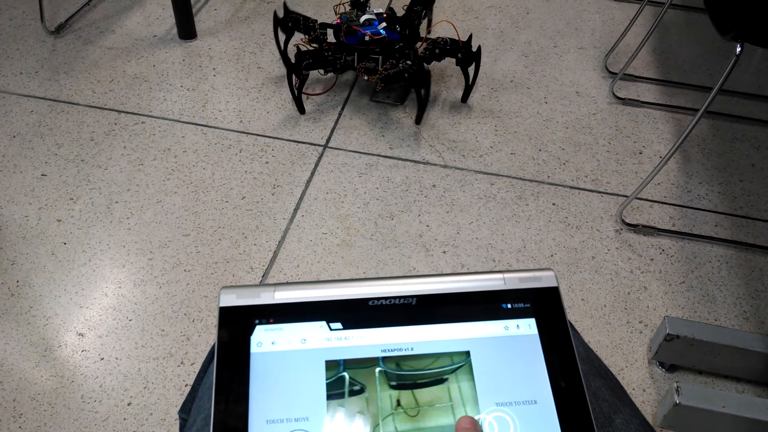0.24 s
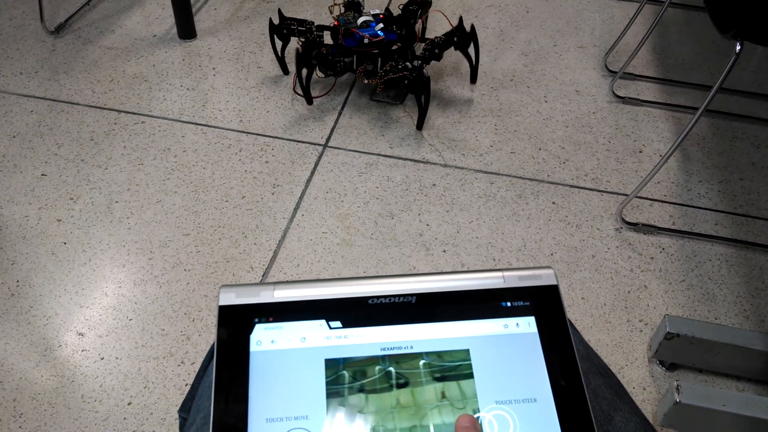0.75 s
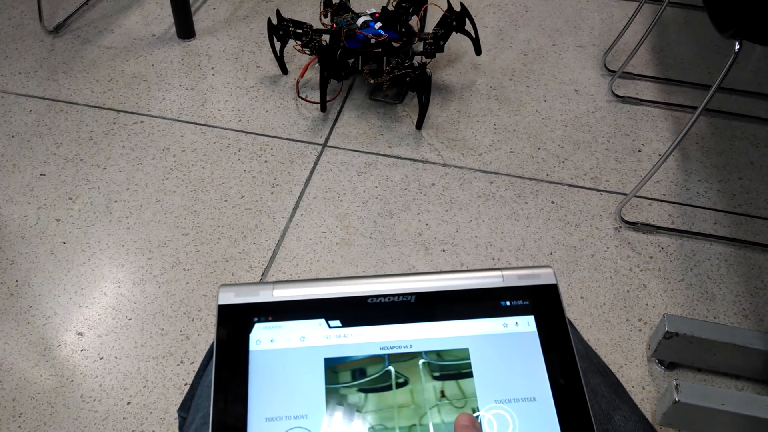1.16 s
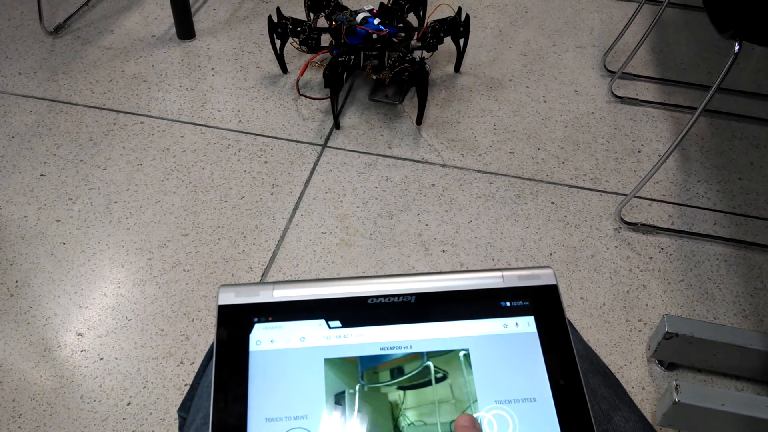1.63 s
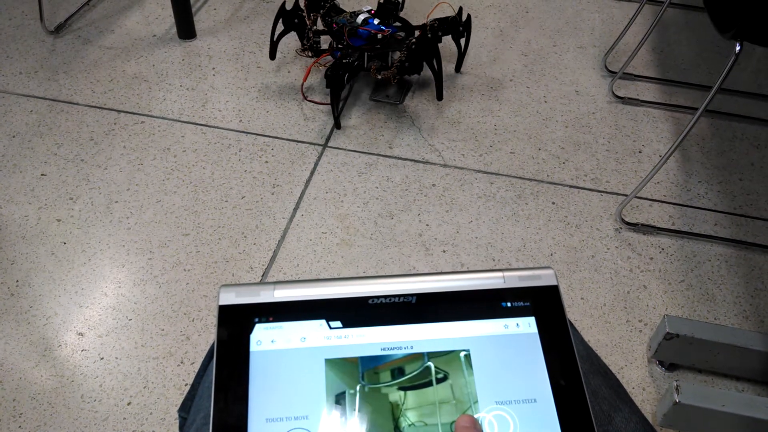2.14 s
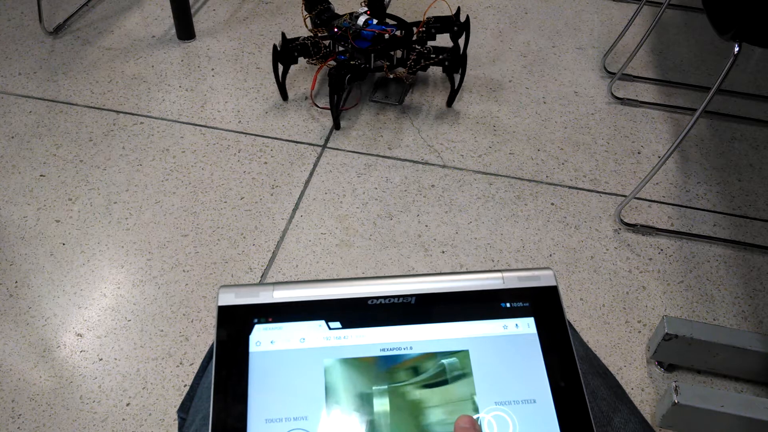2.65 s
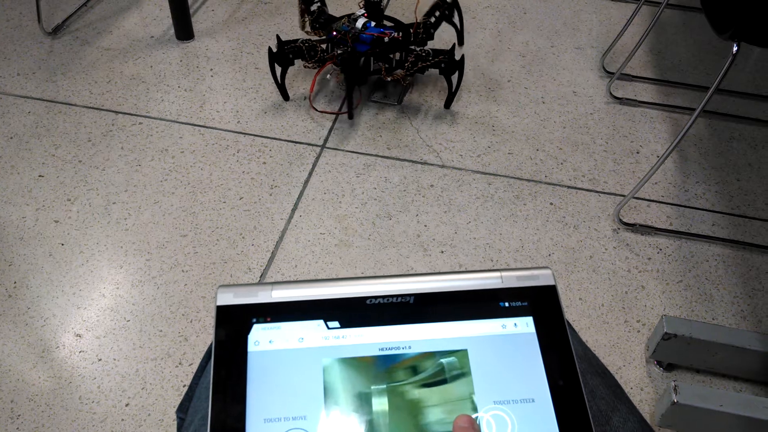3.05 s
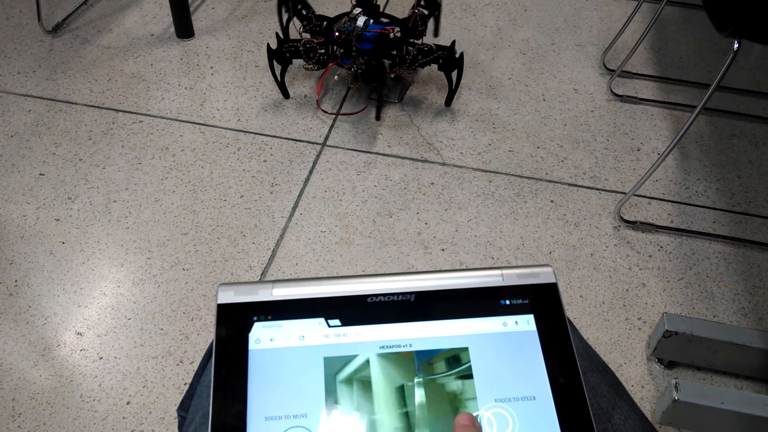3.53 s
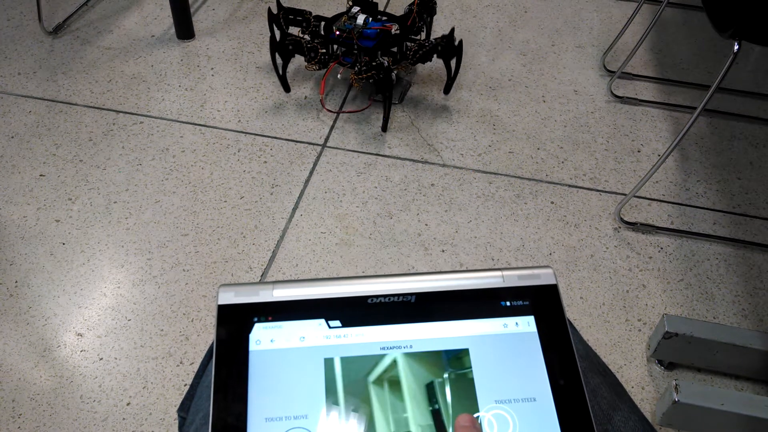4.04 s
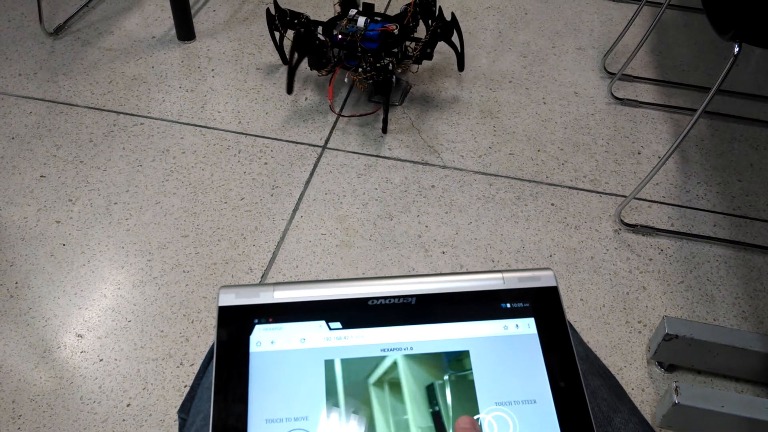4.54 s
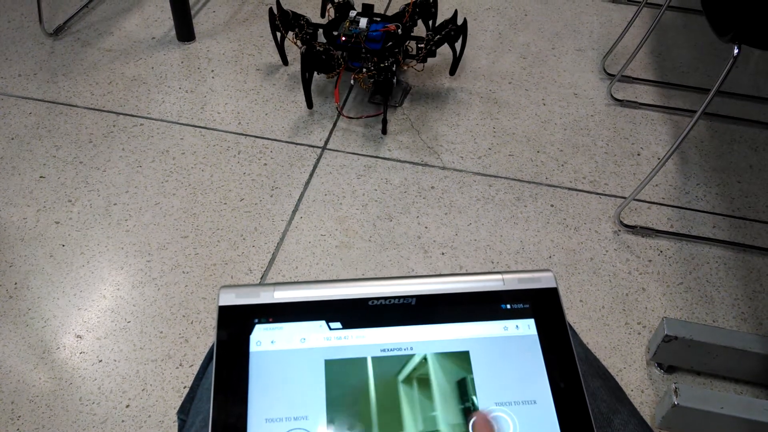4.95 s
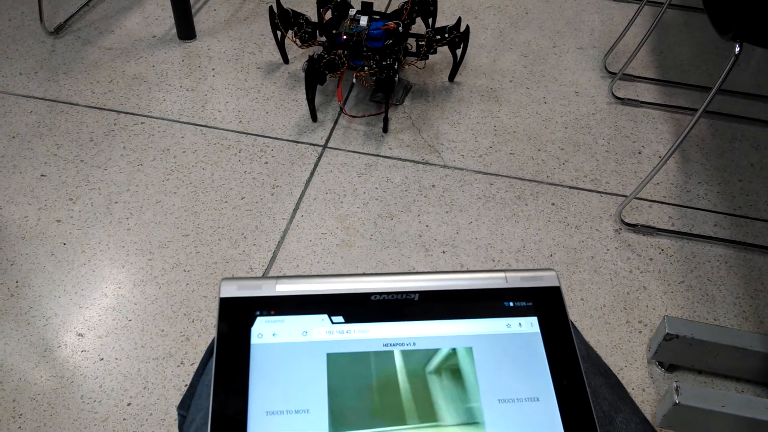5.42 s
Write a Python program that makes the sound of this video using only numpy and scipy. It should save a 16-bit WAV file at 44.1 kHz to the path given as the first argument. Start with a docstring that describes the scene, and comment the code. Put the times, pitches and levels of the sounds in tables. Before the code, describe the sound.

A small six-legged robot walks across a hard indoor floor. Its servo motors whir in short pulses, about four a second, with a high, raspy rattle of plastic gears. Feet tick and joints scrape briefly, and now and then the body drops onto a leg with a soft double knock, twice with a sharp click. A dull bump comes near the end. The room echoes lightly, and ventilation hums behind.

```python
"""A ventilated room with a hard floor; a small six-legged robot walks across it.
Gait: a cycle of nine moves, about four a second. Servos run up and stop, gear teeth rattling
and whining in plastic cases. Feet tick, joints scrape, and now and then the frame drops onto
a leg with a soft double knock. A dull bump as it comes to rest. Behind it: air, fan tones, a drone."""
import sys
import numpy as np
from scipy import signal
from scipy.fft import rfft, irfft, next_fast_len
from scipy.io import wavfile

SR = 44100
rng = np.random.default_rng(int(sys.argv[2]) if len(sys.argv) > 2 else 0)


def store_wav(level_fs):
    """Save 16-bit WAV to argv[1]."""
    pcm = np.round(np.clip(np.atleast_2d(level_fs), -1, 1) * 32767)
    wavfile.write(sys.argv[1], SR, pcm.T.astype(np.int16))


N = 250481
TIME = np.arange(N) / SR
FFT_SIZE = next_fast_len(N + SR)
HZ = np.maximum(np.arange(FFT_SIZE // 2 + 1) * SR / FFT_SIZE, 1)
CUTOFF_HZ = 15550

# Frame drops onto a leg. Each row: start in seconds, first and second blow in dB, gap in seconds.
DROPS = [(.406, -35.5, -37, 0.047), (1.6096, -25.5, -22, 0.038), (2.75, -37, -38.5, 0.04),
         (3.452, -41.5, -48, 0.054), (3.8715, -29, -27, .033), (5.181, -31, -41, 0.039)]


def from_db(db):
    """Decibels to gain."""
    return 10 ** (np.asarray(db) / 20)


def unit_rms(x):
    """Scale to rms 1."""
    return x / np.sqrt(np.mean(x ** 2) + 1e-20)


def over_time(rows):
    """Interpolate each column after the time column at every sample."""
    times_s, *columns = np.transpose(rows)
    return [np.interp(TIME, times_s, column) for column in columns]


def over_hz(points):
    """Interpolate a table on a log-frequency axis."""
    hz, value = np.transpose(points)
    return np.interp(np.log(HZ), np.log(hz), value)


def filtered(x, gain):
    """Apply a gain per frequency."""
    return irfft(rfft(x, FFT_SIZE) * gain, FFT_SIZE)[..., :N]


def colour(spectrum):
    """Gain per frequency that keeps the power of white noise."""
    return unit_rms(from_db(over_hz(spectrum)) * (HZ < CUTOFF_HZ + 500))


def drift(rate_hz):
    """Slow random signal, rms 1."""
    return unit_rms(filtered(rng.standard_normal(FFT_SIZE), 1 / (1 + (HZ / rate_hz) ** 2)))


def rough_tone(hz, width_hz):
    """Two independent narrow noise bands around a pitch given per sample."""
    phase = 2 * np.pi * np.cumsum(hz) / SR
    return np.array([drift(width_hz) * np.sin(phase) + drift(width_hz) * np.cos(phase)
                     for _ in range(2)])


def swell(peak_s, db, half_s):
    """Bell-shaped envelope."""
    return from_db(db) * np.exp(-((TIME - peak_s) / half_s) ** 2)


def reflections(x, t60_s):
    """Two independent sprays of dying echoes, each of unit energy."""
    t = TIME[:SR]
    spray = rng.standard_normal((2, SR)) * from_db(-60 * t / t60_s) * (1 - np.exp(-t / 0.00036))
    spray /= np.sqrt(np.sum(spray ** 2, axis=1, keepdims=True))
    return filtered(x, rfft(spray, FFT_SIZE))


def moving_reflections(x, t60_s, pose_rad):
    """A change of pose shifts the sound between two sets of echo paths."""
    return reflections(x * np.cos(pose_rad), t60_s) + reflections(x * np.sin(pose_rad), t60_s)


def room(x):
    """Wall echoes, one tail per band; weakest and shortest at the top."""
    # Each row: upper edge in Hz, gain in dB, T60 in seconds.
    bands = [(3150, 1.5, 0.83), (6660, -6, 0.97), (20000, -8.5, 0.5)]
    pose_rad = 2.75 * drift(2.3)
    echoes, below = 0, 0
    for edge_hz, db, t60_s in bands:
        up_to_edge = 1 / (1 + (HZ / edge_hz) ** 8)
        band = filtered(x, np.sqrt(np.abs(up_to_edge - below)))
        echoes = echoes + from_db(db) * moving_reflections(band, t60_s, pose_rad)
        below = up_to_edge
    return echoes


def ventilation(rumble_db=-40.5, rumble_top_hz=750, fan_hz=528.5, waver_db=2, waver_rad=1.08):
    """Rumble and rush of moving air, a faint whistle, wavering fan and mains tones."""
    # Air spectra. Each row: frequency in Hz, relative density in dB.
    rumble_spectrum = [(12, -44), (22, -5), (50, 1), (76, -9.5), (110, -6), (146, 2.5), (175, -7),
                       (233, 2.5), (340, -1), (424, -6.5), (560, -3.5), (850, -11.5)]
    rush_spectrum = [(500, -5), (800, 3), (1100, 2), (1450, -2), (2000, -3.5), (2500, -6.5), (3000, -9),
                     (4200, -18), (6000, -20), (9000, -19.5), (15500, -21.5)]
    # Level curves. Each row: time in seconds, relative level in dB.
    rush_curve = [(0.0, -48.5), (1.06, -47.5), (2.34, -51.5), (2.7, -50), (3.94, -52), (5.68, -49)]
    fan_curve = [(0.0, -52), (0.19, -54), (1.15, -54), (1.6, -55), (2.35, -53.5), (2.9, -58), (4.7, -72),
                 (5.68, -55.5)]
    # Each row: time in seconds, pitch in Hz, rms level in dB.
    whistle_curve = [(0, 843, -59), (1.0, 855, -57), (1.28, 871, -49), (1.5, 863, -53), (1.75, 878, -89)]
    # Fan and mains hum. Each row: frequency in Hz, level in dB.
    hum_tones = [(59.2, -58.5), (100.2, -59), (197, -57), (646, -67)]
    rumble_gain = colour(rumble_spectrum) / np.sqrt(1 + (HZ / rumble_top_hz) ** 10)
    rumble = filtered(rng.standard_normal((2, N)), rumble_gain)
    rush = filtered(rng.standard_normal((2, N)), colour(rush_spectrum))
    air = from_db(rumble_db) * rumble + from_db(over_time(rush_curve)[0] + 4) * rush
    whistle_hz, whistle_db = over_time(whistle_curve)
    air += from_db(whistle_db) * rough_tone(whistle_hz, width_hz=21)
    fan_whine = (fan_hz, over_time(fan_curve)[0] + 1.9)
    for hz, db in hum_tones + [fan_whine]:
        phase = 2 * np.pi * hz * TIME + waver_rad * drift(6.1)
        tone = np.sqrt(2) * np.array([np.sin(phase), np.cos(phase)])
        air += from_db(db + waver_db * drift(2.5)) * tone
    return air


def drone(hz=141):
    """A low, rough drone in the room swells twice."""
    envelope = swell(peak_s=1.38, db=-47.5, half_s=.15) + swell(peak_s=5.5, db=-52, half_s=.44)
    return envelope * rough_tone(np.full(N, hz), width_hz=3.4)


def bump(start_s=5.245, db=-36, hz=87.9, rise_s=0.012, t60_s=0.34):
    """One deep mode swells and dies as the robot comes to rest."""
    t = np.maximum(TIME - start_s, 0)
    envelope = (1 - np.exp(-t / rise_s)) * from_db(db - 60 * t / t60_s)
    return np.array([envelope * np.sin(2 * np.pi * hz * t), np.zeros(N)])


def drop_blows(start_s, first_db, second_db, gap_s, bounce_loss_db=3.5):
    """Impulses of one drop: two blows, then three uneven, dying bounces."""
    blows = np.zeros(N)
    blows[int(start_s * SR)] = from_db(first_db)
    blows[int((start_s + gap_s) * SR)] = from_db(second_db)
    for k in range(2, 5):
        bounce_s = start_s + gap_s * (k + rng.uniform(-.125, .125))
        blows[int(bounce_s * SR)] = from_db(first_db - bounce_loss_db * k)
    return blows


def frame_knocks(band_hz=(140, 650), pose_detune=0.017, room_db=-3, room_t60_s=1.23):
    """Soft blows ring the frame, slightly detuned in each pose; the room booms after them."""
    # Frame and legs. Each row: frequency in Hz, level in dB, T60 in seconds.
    frame_modes = [(147, -11.5, 0.36), (199.5, -8.5, 0.5), (236, -7, 0.16), (288, -1.5, 0.1),
                   (336, -10.5, 0.17), (392, -8.5, 0.1), (482, -19, 0.07)]
    t, thud = TIME[:SR], 0
    for drop in DROPS:
        ring = 0
        for hz, db, t60_s in frame_modes:
            detuned_hz = hz * (1 + pose_detune * rng.standard_normal())
            ring += np.sin(2 * np.pi * detuned_hz * t) * from_db(db - 60 * t / t60_s)
        thud += filtered(drop_blows(*drop), rfft(ring, FFT_SIZE))
    # The small frame radiates no deep bass, the soft contact no treble.
    thud = signal.sosfilt(signal.butter(3, band_hz, "band", fs=SR, output="sos"), thud)
    return np.array([thud, np.zeros(N)]) + from_db(room_db) * reflections(thud, room_t60_s)


def joint_scrapes(width_hz=280):
    """Joint friction swells and fades in a narrow resonance."""
    # Each row: peak time in seconds, level in dB, half length in seconds, resonance in Hz.
    scrapes = [(0.565, -34, 0.016, 4980), (0.85, -41.5, 0.04, 4693), (2.83, -36.5, .023, 4976),
               (2.882, -33, .012, 6980), (3.116, -41, 0.015, 4730), (4.106, -37, .012, 6485)]
    return sum(swell(peak_s, db, half_s) * rough_tone(np.full(N, hz), width_hz)
               for peak_s, db, half_s, hz in scrapes)


def contact_ticks(hold_s=0.0006, t60_s=0.012):
    """Hard contacts of feet and joints: cracks that die within milliseconds."""
    # Each row: start in seconds, level in dB, thinness from 0 to 1.
    contacts = [(0.548, -26.5, .5), (1.197, -35.5, 0.9), (1.451, -30, 0.99), (1.6137, -14.5, 0.14),
                (1.616, -18, 0.1), (1.626, -27, 0), (1.653, -29, 0), (1.6873, -27.5, 0), (2.716, -21, 0.99),
                (3.4491, -34.5, 0.95), (3.7112, -32, 0.95), (3.8756, -11.5, 0.18), (3.8889, -37, 0),
                (3.909, -39, .7)]
    # Colour of the bright, broadband ticks. Each row: frequency in Hz, relative density in dB.
    tick_spectrum = [(800, -9), (1700, 0), (2900, 5), (3700, 7.5), (4800, 3), (5600, 5.5), (6600, 12.5),
                     (8200, 3), (9700, 6.5), (11000, 5.5), (13000, -1), (14300, 1), (15500, -5)]
    t, cracks = TIME[:SR // 10], np.zeros((2, N))
    for start_s, db, thinness in contacts:
        at = int(start_s * SR)
        envelope = from_db(db - 60 * np.maximum(t - hold_s, 0) / t60_s)
        crack = rng.choice([-1, 1], (2, len(t))) * envelope
        cracks[:, at:at + len(t)] += signal.lfilter([1, -thinness], [1], crack)
    return filtered(cracks, colour(tick_spectrum))


def gear_whine(effort, whine_hz, power, width_hz=80, sag=.05, wobble=0.0087):
    """The gears of the strongest move sing roughly; pitch wavers, and sags as effort falls."""
    # Gear stages. Each row: ratio to the whine pitch, level in dB.
    stages = [(.5, -10.5), (.66, -11), (.83, -7), (1, 0.5), (1.32, -10)]
    move_power = power * effort ** 4
    strongest = move_power.argmax(0)
    slack = 1 - effort[strongest, np.arange(N)]
    pitch_hz = whine_hz[strongest, 0] * (1 - sag * slack + wobble * drift(24.7))
    tones = sum(from_db(db) * rough_tone(pitch_hz * ratio, width_hz * ratio) for ratio, db in stages)
    return np.sqrt(move_power.max(0)) * tones


def rotor_buzz(speed, rotor_hz, wander=0.0525, depth_db=2.1):
    """Tooth load peaks once per motor turn; a gain of rms 1."""
    turns = np.cumsum(rotor_hz * speed * (1 + wander * drift(14.5))) / SR
    return unit_rms(from_db(depth_db * np.cos(2 * np.pi * turns)))


def gear_train(speed, mesh_hz, backlash_teeth=.14, uneven_db=2.5):
    """One click per meshing tooth; backlash shifts each by part of a tooth."""
    teeth_passed = np.cumsum(mesh_hz * speed) / SR
    tooth = np.arange(20000)
    lateness, strength = np.clip(rng.standard_normal((2, len(tooth))), -2, 2)
    at = np.searchsorted(teeth_passed, tooth + backlash_teeth * lateness)
    clicks = np.bincount(at, from_db(uneven_db * strength), N + 1)[:N]
    return unit_rms(clicks - clicks.mean())


def gear_rattle(speed, friction_db=-5.5, early_db=-3.5):
    """Tooth clicks and sliding friction of four gear trains, scattered by floor and frame."""
    mesh_hz = np.geomspace(800, 1600, 4) * rng.uniform(.9, 1.1, 4)
    trains = np.array([gear_train(speed, hz) for hz in mesh_hz])
    clicks = unit_rms(np.array([trains[::2].sum(0), trains[1::2].sum(0)]))
    direct = unit_rms(clicks + from_db(friction_db) * rng.standard_normal((2, N)))
    early = moving_reflections(direct, t60_s=0.0065, pose_rad=2.43 * drift(5.24))
    return unit_rms(direct + from_db(early_db) * early)


def gear_moves(run_up_s=.066, run_down_s=.047):
    """All that works the gears: gait steps, strains under extra load, jolts from the drops."""
    # Each row: peak time in seconds, relative length, gear noise in dB, shrill share from 0 to 1,
    # whine in Hz, whine in dB relative to the noise.
    gait = [(.101, 0.96, -33.5, 0.68, 9210, -10.5), (.355, 1.04, -32, 0.82, 9320, -10.5),
            (.606, 1.2, -33.5, 0.45, 7960, -8), (.877, 0.99, -36, 0.24, 6830, -7.5),
            (1.124, 1.05, -44, 0, 6160, -11.5), (1.382, 1.11, -36.5, 0.5, 7220, -9.5),
            (1.595, 0.94, -34.5, 0.6, 6500, -12), (1.881, 1.01, -31, 0.38, 7590, -9),
            (2.141, 0.93, -34, 0.28, 5970, -13), (2.368, 0.97, -43, 0.01, 5315, -12),
            (2.625, 1.02, -32.5, 0.63, 9420, -9), (2.884, 0.98, -32, 0.3, 7875, -7.5),
            (3.137, 1, -35, 0.2, 6934, -8), (3.387, 1.1, -43.5, 0.1, 6150, -12.5),
            (3.64, 1.05, -35.5, 0.55, 7286, -11), (3.866, 1, -35, 0.32, 6560, -12),
            (4.145, 1.06, -33, .32, 7630, -5), (4.381, 1.05, -34.5, .26, 5934, -15),
            (4.626, 1.04, -43.5, 0.05, 5356, -10.5), (4.882, 1.14, -35.8, 0.61, 9360, -5.5),
            (5.149, 1.17, -32, 0.73, 9240, -8)]
    # Each row: peak time in seconds, gear noise in dB.
    extra_loads = [(.388, -34), (2.712, -28.5)]

    def move(peak_s, rise_s, fall_s, db, shrill_share, whine_hz=0, whine_db=-np.inf):
        power = from_db(db) ** 2
        shrill, raspy = shrill_share * power, (1 - shrill_share) * power
        return peak_s, rise_s, fall_s, shrill, raspy, whine_hz, from_db(db + whine_db) ** 2

    steps = [move(peak_s, run_up_s * length, run_down_s * length, *sound)
             for peak_s, length, *sound in gait]
    strains = [move(peak_s, rise_s=.055, fall_s=.03, db=db, shrill_share=.77,
                    whine_hz=9500, whine_db=-9.5) for peak_s, db in extra_loads]
    jolts = [move(start_s + .015, rise_s=.006, fall_s=.045, db=second_db - 5, shrill_share=.017)
             for start_s, _, second_db, _ in DROPS]
    return steps + strains + jolts


def servos(shrill_rotor_hz=148, raspy_rotor_hz=278.2, pace_spread=.07, flutter_db=1.36, gain_db=0.2):
    """Each move runs up, holds briefly and stops at its own pace; shrill and raspy servos share it."""
    # Servo cases. Each row: frequency in Hz, relative density in dB.
    shrill_case = [(900, -31), (1500, -7), (2000, -1), (2600, -1.5), (3100, -30), (3700, -29), (5200, -3),
                   (6900, 4), (7900, 4), (8600, 2), (9350, 7), (10100, 1.5), (12300, -0.5), (15000, -3)]
    raspy_case = [(900, -22), (1600, -16), (2600, -8.5), (3500, -9), (4200, -6), (4900, -5.5), (5900, -2.5),
                  (7800, -4), (8600, -6), (9600, -9), (10300, -9), (12300, -9.5), (14000, -10.5),
                  (15500, -17)]
    moves = np.transpose(gear_moves())[:, :, None]
    peak_s, rise_s, fall_s, shrill_power, raspy_power, whine_hz, whine_power = moves
    ramp_s = np.where(TIME < peak_s, rise_s, fall_s)
    effort = np.exp(-np.abs((TIME - peak_s) / ramp_s) ** 2.3)
    pace = np.exp(pace_spread * np.sum(rng.standard_normal(peak_s.shape) * effort, axis=0))
    speed = pace * (effort.sum(0) + .01) ** .05
    sound = gear_whine(effort, whine_hz, whine_power)
    for case, power, rotor_hz in ((shrill_case, shrill_power, shrill_rotor_hz),
                                  (raspy_case, raspy_power, raspy_rotor_hz)):
        envelope = np.sqrt(np.sum(power * effort ** 2, axis=0))
        gears = filtered(gear_rattle(speed) * rotor_buzz(speed, rotor_hz), colour(case))
        sound += gears * envelope * from_db(gain_db + flutter_db * drift(62))
    return sound


def stereo_image(pair, in_phase_hz=1346):
    """Two signals as mid and side to left and right; the treble swings in and out of phase."""
    # Each row: frequency in Hz, greatest coherence of the channels.
    coherence = [(50, 0.55), (300, 0.58), (550, 0.54), (1200, 0.94), (2750, 0.99), (4000, 0.48),
                 (5300, 0.64), (6800, 0.32), (9400, 0.63), (12000, 0.39), (15000, 0.27)]
    # Each row: frequency in Hz, left minus right in dB.
    balance = [(60, 1), (150, 3.5), (400, 0), (1000, 0.4), (2400, 2), (4000, -2), (5000, -0.5), (7500, -1),
               (9400, -5), (12000, -7), (15000, -8)]
    swing = np.cos(np.pi * np.maximum(HZ / in_phase_hz - 1, 0))
    correlation = np.clip(over_hz(coherence), 0, .98) * swing
    mid, side = filtered(pair, np.sqrt([1 + correlation, 1 - correlation]))
    left_ratio = from_db(over_hz(balance))
    gains = np.array([left_ratio, np.ones_like(HZ)]) / np.sqrt(1 + left_ratio ** 2)
    return filtered(np.array([mid + side, mid - side]), gains)


def scene(tick_room_db=-12):
    """The robot and its echoes over the ventilation."""
    legs = servos() + joint_scrapes()
    ticks = contact_ticks()
    echoes = room(legs) + from_db(tick_room_db) * reflections(ticks, t60_s=0.68)
    return stereo_image(legs + ticks + echoes + frame_knocks() + bump() + drone() + ventilation())


def record(dry):
    """Steep zero-phase low-pass."""
    return signal.sosfiltfilt(signal.ellip(10, .05, 70, CUTOFF_HZ, fs=SR, output="sos"), dry)


dry = scene()
out = record(dry)
store_wav(out)
```